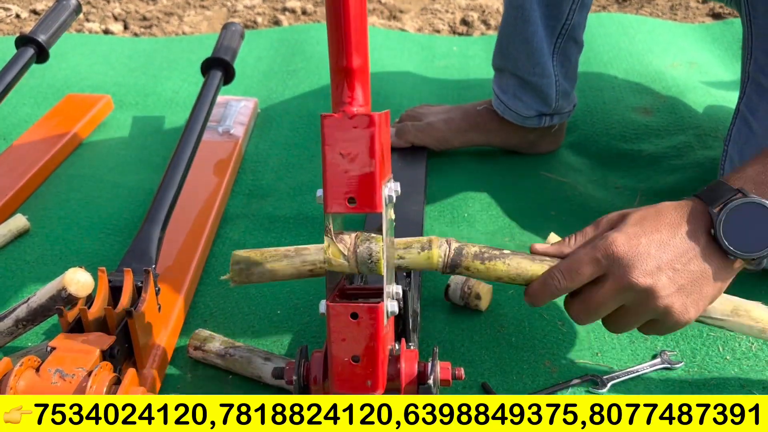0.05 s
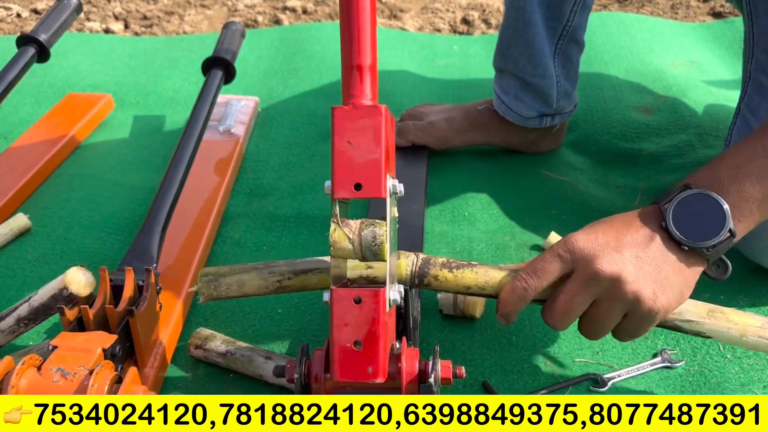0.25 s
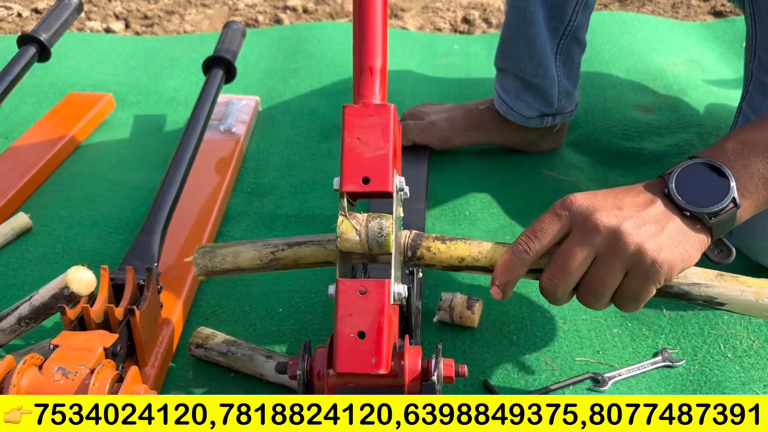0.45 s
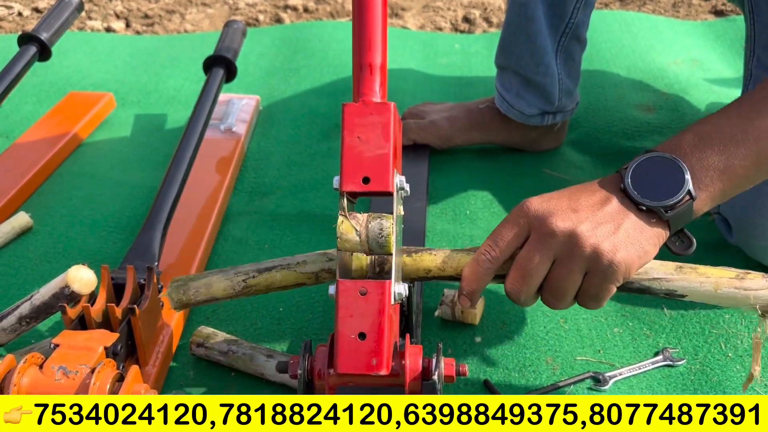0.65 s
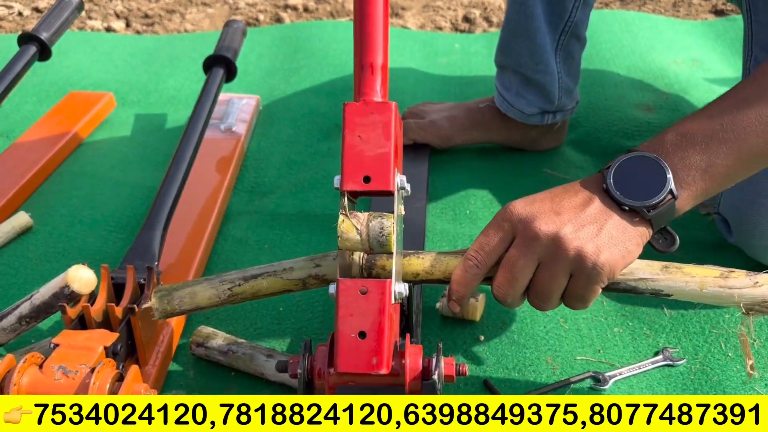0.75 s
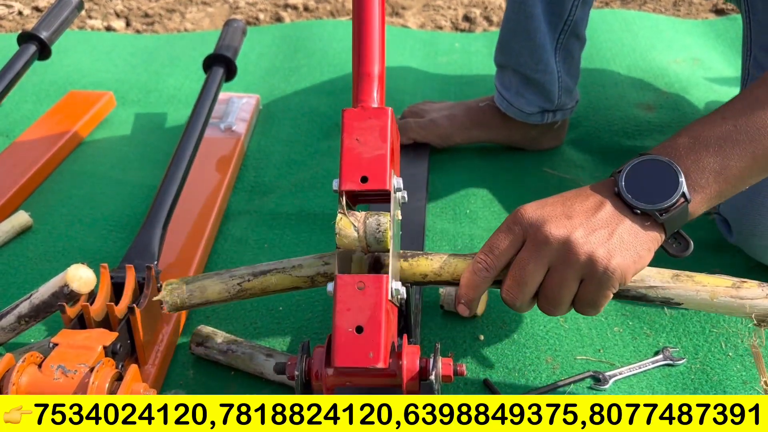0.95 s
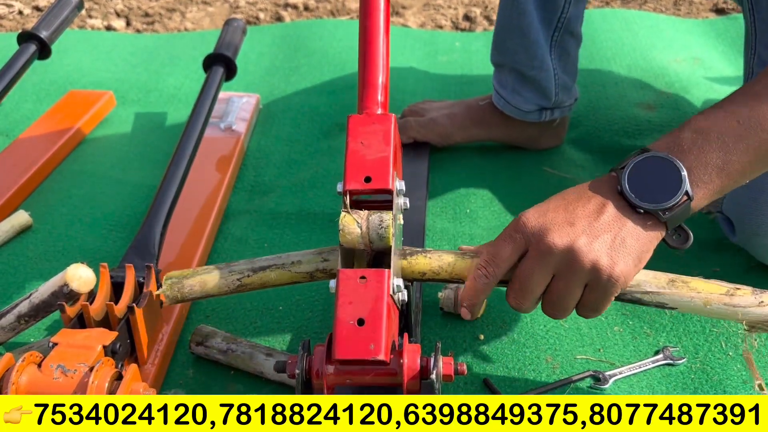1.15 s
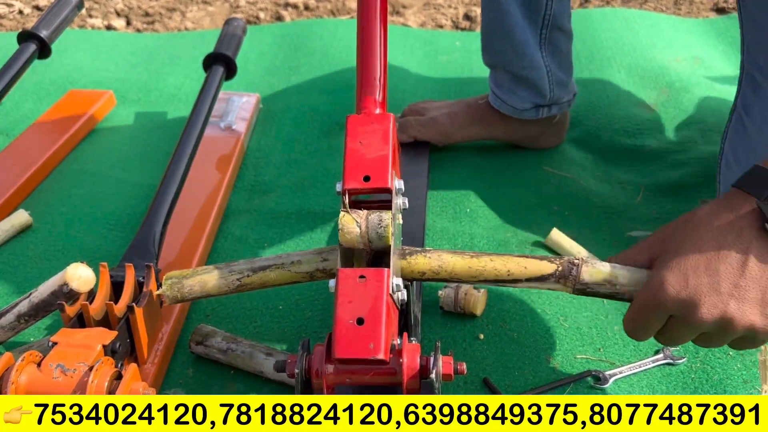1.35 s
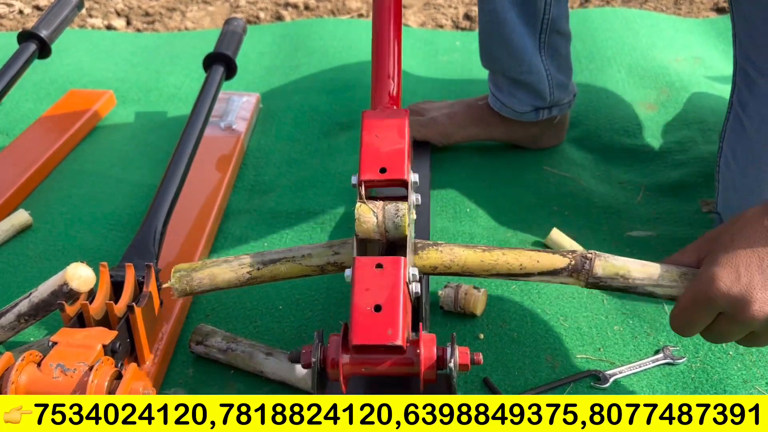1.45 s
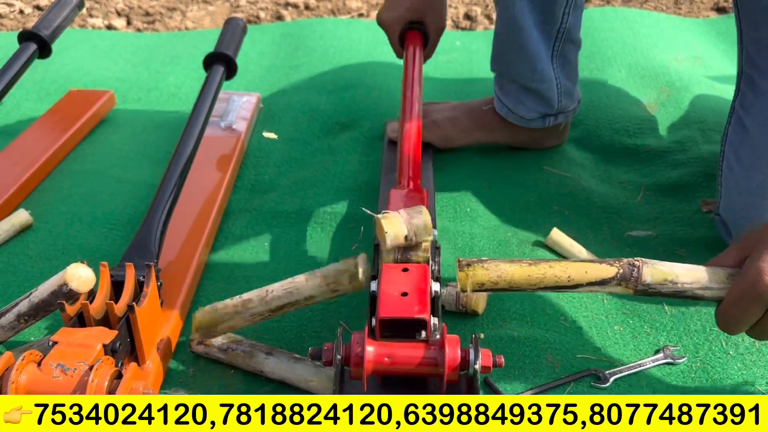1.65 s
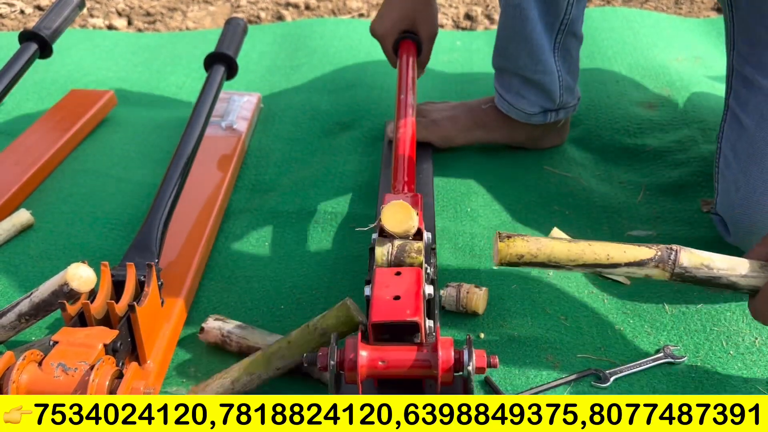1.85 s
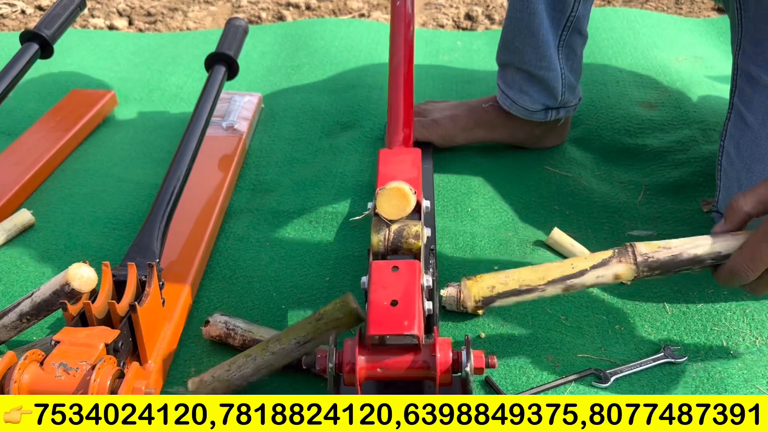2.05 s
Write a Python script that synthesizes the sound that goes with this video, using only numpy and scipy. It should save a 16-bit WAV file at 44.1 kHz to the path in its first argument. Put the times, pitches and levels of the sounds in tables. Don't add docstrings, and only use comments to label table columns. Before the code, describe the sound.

A hand-lever cutter chops through thick cane with a loud crunching snap, then its lever clacks

```python
import sys
import numpy as np
from scipy import signal
from scipy.fft import rfft, irfft, next_fast_len
from scipy.io import wavfile
from scipy.ndimage import uniform_filter1d, map_coordinates

SR = 44100
rng = np.random.default_rng(int(sys.argv[2]) if len(sys.argv) > 2 else 0)


def store_wav(level_fs):
    pcm = np.round(np.clip(np.atleast_2d(level_fs), -1, 1) * 32767)
    wavfile.write(sys.argv[1], SR, pcm.T.astype(np.int16))


def boost(x):
    u = np.asarray(x, float) / 20
    return 10 ** u


N = 92962

# frequency in Hz, density in dB per Hz.
AIR_TONE = [(12, -46.5), (30, -16.5), (70, -4), (194, -2), (547, -14), (595, -12), (4610, -16.5),
            (16300, -38)]
# frequency in Hz, width in Hz, level in dB.
AIR_HUMPS = [(567, 31, -4), (1750, 960, -13), (3395, 460, -13.5)]
# time in seconds, level in dB.
AIR_SWELL = [(0.0, -63.5), (1.77, -63.5), (2.11, -65)]

# start in seconds, then base, cradle, blade and tick levels in dB.
KNOCKS = [(0.175, -57, -49, -60, -58), (.186, -52, -49.5, -72, -49.5), (.193, -63, -49.5, -58, -47),
          (0.231, -51.5, -51.5, -52.5, -56), (.335, -58.5, -71, -66, -74), (.570, -51.5, -50, -70, -47.5),
          (.582, -57, -43, -43, -64), (.698, -44, -42.5, -39, -43.5), (0.716, -84, -71, -39.5, -49.5),
          (.720, -40.5, -24.5, -63, -53), (.785, -51.5, -57, -58.5, -74), (0.92, -72, -52, -62, -54),
          (1.122, -54, -56.5, -47.5, -53.5), (1.159, -61, -64, -65, -56), (1.521, -30, -24.5, -19.5, -23),
          (1.606, -36.5, -14, -28.5, -27), (1.712, -36.5, -33, -34, -52), (1.723, -62.5, -26, -40, -52),
          (1.946, -51, -47, -52, -70)]
# frequency in Hz, level in dB, 60 dB decay time in seconds.
BASE_MODES = [(297, 0, .21), (597, -3, .17)]
# frequency in Hz, level in dB, 60 dB decay time in seconds.
CRADLE_MODES = [(528, 0, .17), (500, -16, .05)]
# frequency in Hz, level in dB, 60 dB decay time in seconds.
BLADE_MODES = [(1285, -7, .07), (1604, -12, .15), (1730, -6, .13), (1790, -1, .04), (2050, 0, .035),
               (2200, -4, .03), (2400, -8, .03), (3400, -16, .04)]
# frequency in Hz, density in dB per Hz.
TICK_TONE = [(200, -10), (2000, -4), (3000, -10), (3750, -8), (4600, -11), (7500, -13), (16000, -36)]
# time in seconds, loss in dB.
MUTES = [(.252, 8), (.743, 8), (1.616, 12)]
# frequency in Hz, level in dB, 60 dB decay time in seconds.
PIN_MODES = [(7440, 0, .12), (8330, -3, .12)]
# start in seconds, level in dB.
PIN_HITS = [(1.677, -60), (1.7, -57), (1.709, -63)]
# frequency in Hz, level in dB, 60 dB decay time in seconds.
WASHER_MODES = [(7700, 0, .06)]
# start in seconds, level in dB.
WASHER_HITS = [(.182, -59), (.195, -57), (.742, -62), (.754, -59.5), (1.622, -56.5)]

# start in seconds, frequency in Hz, level in dB, 60 dB decay time in seconds.
THUDS = [(.571, 202, -46.5, 0.06), (0.722, 127, -47, 0.045), (.571, 3740, -40, .025), (.7, 6950, -49, .02),
         (1.49, 246, -30, 0.037), (1.521, 208.7, -29, 0.028), (1.89, 3770, -35.5, 0.014),
         (0.479, 2390, -50, 0.028), (1.523, 120, -36, 0.08), (1.643, 93, -40, 0.08),
         (1.776, 88, -29.5, 0.052), (1.883, 60, -32, 0.061), (1.947, 1310, -36.5, 0.041),
         (1.958, 813, -46, 0.05)]
# time in seconds, level in dB.
SCUFFS = [(1.86, -67), (1.875, -51.5), (1.891, -42.5), (1.90, -62), (1.955, -54.5), (2.0, -69.5)]
# frequency in Hz, density in dB per Hz.
SCUFF_TONE = [(88, -42), (150, 0.5), (1260, -8.5), (2400, -17.5), (3840, -18.5), (16000, -41)]

# time in seconds, level in dB.
STRAIN = [
    (1.33, -72.5),
    (1.44, -62.5),
    (1.474, -57),
    (1.488, -39.5),
]
# start in seconds, level in dB, 60 dB decay time in seconds,
# pitch of the splitting strip in Hz, level of crack over strip in dB.
SNAPS = [(1.476, -42.5, 0.0084, 1920, 4.5), (1.4815, -32, 0.0098, 5070, 2.5),
         (1.4883, -14.5, 0.0092, 1780, 4.5), (1.489, -11, 0.011, 2080, -1),
         (1.4917, -8.5, 0.0087, 1750, -16), (1.4887, -11.5, 0.017, 2630, -9),
         (1.4889, -19.5, 0.019, 3540, -2.5), (1.489, -21, 0.022, 4930, -4.5),
         (1.5195, -25, .012, 4570, -10.5), (1.4955, -20.5, 0.024, 2107, -7.5),
         (1.5028, -25, 0.022, 4840, 1.5), (1.509, -29, 0.0087, 1730, -2), (1.514, -26, .015, 2050, -6.5),
         (1.5175, -16.5, 0.012, 2557, -3.5), (1.5197, -14, .011, 1716, 4), (1.5208, -17, 0.0089, 1276, 3.5),
         (1.5245, -20.5, 0.022, 1243, -4), (1.531, -25, 0.017, 2050, 4.5), (1.537, -17, .012, 1507, -6),
         (1.5457, -12.5, 0.019, 1623, -9), (1.549, -15.5, 0.019, 2073, -4.5),
         (1.555, -23, 0.059, 3340, -5.5), (1.5565, -18, .015, 1430, -5.5), (1.5635, -15, 0.01, 2080, -4),
         (1.571, -10, 0.012, 1730, -9.5), (1.578, -19, 0.014, 2200, -5.5), (1.586, -21, 0.014, 1383, -7),
         (1.6005, -11, 0.024, 1362, -5)]
# time in seconds, level in dB.
TEARING = [(1.49, -23.5), (1.5, -30), (1.512, -30), (1.522, -27), (1.54, -22.5), (1.57, -27),
           (1.595, -21.5), (1.612, -26.5), (1.64, -64)]
# frequency in Hz, density in dB per Hz.
FIBRE_TONE = [(59, -66.5), (100, -24), (289, -10.5), (600, -8.5), (1030, -17), (1720, -0.5), (2470, -8.5),
              (4670, -8.5), (10000, -21), (16000, -41.5)]
# frequency in Hz, width in Hz, level in dB.
CANE_RESONANCES = [(458, 100, -16), (843, 180, -4), (1310, 150, 4.5), (1700, 42.3, -6.5), (1610, 52, -2.5),
                   (2110, 58, 3), (2700, 210, -2.5), (3340, 18, -9.5), (4570, 32, -23.5),
                   (5600, 34.5, -21.5), (6120, 81, -8), (7060, 490, -11.5)]

# frequency in Hz, level in dB, 60 dB decay time in seconds.
JAW_MODES = [(605, -10, .14), (820, -12, 0.05), (1330, -10, .05), (1650, -14, 0.12), (2398, 3, .03),
             (3156, -2, 0.028), (3280, -21, .12)]
# frequency in Hz, level in dB, 60 dB decay time in seconds.
LEVER_MODES = [(382, -12, .3), (431, -5.5, .42), (408, 1, .045), (760, -19, .25), (818, -21, .22),
               (867, -24, .2)]
# time in seconds, level in dB.
RATTLE = [(1.62, -33.5), (1.65, -38.5), (1.70, -41.5), (1.735, -48), (1.76, -65), (1.80, -79)]
# frequency in Hz, density in dB per Hz.
RATTLE_TONE = [(350, -37.5), (600, -5.5), (1510, -14), (1680, -10.5), (3200, -17.5), (14000, -51.5)]
# frequency in Hz, width in Hz, level in dB.
RATTLE_RESONANCES = [(778, 64, 0), (1320, 70, 1), (1680, 100, 3), (2160, 80, -10), (2750, 90, -12),
                     (3300, 160, -4), (4160, 120, -16), (4600, 110, -13), (5850, 140, -20)]
# frequency in Hz, level in dB, 60 dB decay time in seconds.
STOP_MODES = [(296, -10, .28), (592, -6, .19), (883, -15, .14), (1170, 5, .05), (1227, 0, .12),
              (1610, -3, .15), (2649, -3, .04), (2870, 11, .022), (4570, -1, .045), (5518, -22, .15),
              (6767, -23, .11), (7434, -38, .7), (8323, -33, .18), (9351, -33, .15)]
# frequency in Hz, density in dB per Hz.
STOP_TONE = [(250, -11), (700, -5.5), (1200, 5), (3000, -6), (5000, -10), (9000, -19.5), (16000, -65)]


def along(points, hz):
    f, v = np.transpose(points)
    return np.interp(np.log(hz + 1), np.log(f + 1), v)


def unit(x):
    return x / np.sqrt(np.mean(x ** 2) + 1e-20)


def level(rows):
    s, db = np.transpose(rows)
    return boost(np.interp(np.arange(N) / SR, s, db, left=-150, right=-150))


def toned(tone):
    return lambda f: boost(along(tone, f))


def peaked(tone, peaks, share_db):
    def gain(f):
        peak_power = 0
        for centre, width, db in peaks:
            peak_power = peak_power + boost(2 * (db + share_db)) / (1 + (2 * (f - centre) / width) ** 2) ** 2
        return np.sqrt(boost(2 * along(tone, f)) + peak_power)
    return gain


def coloured(x, gain):
    m = 2 * next_fast_len(N // 2 + 4096)
    g = gain(np.fft.rfftfreq(m, 1 / SR))
    cepstrum = irfft(np.log(g / np.sqrt(np.mean(g ** 2)) + 1e-6), m)
    cepstrum[1:m // 2] *= 2
    cepstrum[m // 2 + 1:] = 0
    return irfft(rfft(x, m) * np.exp(rfft(cepstrum)), m)[:N]


def patchy(x, depth_db, size, bins, frames):
    z = signal.stft(x, nperseg=size)[2]
    field = uniform_filter1d(rng.standard_normal(z.shape), bins, 0)
    field = uniform_filter1d(field, frames, 1)
    return signal.istft(z * boost(depth_db * unit(field)), nperseg=size)[1][:N]


def add(track, s, sound):
    part = track[round(s * SR):][:len(sound)]
    part += sound[:len(part)]


def flutter(t, depth_db):
    per_s = 50
    shake = map_coordinates(rng.standard_normal(per_s), [t * per_s])
    return depth_db * np.minimum(t / .03, 1) * shake


def ring(modes, db, rise_s=.0005, scatter_db=.5, flutter_db=2):
    t = np.arange(SR // 2) / SR
    hit = np.zeros(len(t))
    for hz, mode_db, t60 in modes:
        strike_db = db + mode_db + scatter_db * rng.normal()
        hit += boost(strike_db + flutter(t, flutter_db) - 60 * t / t60) * np.sin(2 * np.pi * hz * t)
    return hit * (1 - np.exp(-t / rise_s))


def burst(db, t60, rise_s=.0001):
    t = np.arange(SR // 10) / SR
    return boost(db - 60 * t / t60) * (1 - np.exp(-t / rise_s)) * rng.standard_normal(len(t))


def grit(per_s, spread_db):
    breaks = (rng.random(N) < per_s / SR) * rng.standard_normal(N)
    sizes = boost(spread_db * rng.exponential(size=N))
    return unit(breaks * sizes + 0.25 * rng.standard_normal(N))


def air():
    noise = patchy(rng.standard_normal(N), 1.3, 512, 6, 10)
    return boost(2.5) * level(AIR_SWELL) * unit(coloured(noise, peaked(AIR_TONE, AIR_HUMPS, 0)))


def cradle_muting(s):
    t = np.arange(SR // 2) / SR
    loss_db = np.zeros(len(t))
    for at, db in MUTES:
        if 0 < at - s < .05:
            loss_db += db * np.clip((s + t - at) / .003, 0, 1)
    return boost(-loss_db)


def frame():
    out, ticks = np.zeros(N), np.zeros(N)
    for s, base_db, cradle_db, blade_db, tick_db in KNOCKS:
        add(out, s, ring(BASE_MODES, base_db, 0.0028))
        add(out, s, cradle_muting(s) * ring(CRADLE_MODES, cradle_db, 0.0022))
        add(out, s, ring(BLADE_MODES, blade_db, 0.00098, scatter_db=3.5))
        add(ticks, s, burst(tick_db, .03, 0.00093))
    for s, db in PIN_HITS:
        add(out, s, ring(PIN_MODES, db, 0.004))
    for s, db in WASHER_HITS:
        add(out, s, ring(WASHER_MODES, db, 0.0021))
    return out + coloured(ticks, toned(TICK_TONE))


def pieces():
    out = np.zeros(N)
    scuff = level(SCUFFS) * grit(5000, 3.3)
    for s, hz, db, t60 in THUDS:
        add(out, s, ring([(hz, 0, t60)], db, 0.0021))
    add(scuff, 1.8915, burst(-37, 0.0044))
    return out + coloured(scuff, toned(SCUFF_TONE))


def cut():
    breaks_per_s, spread_db = 9900, 0
    strip_db, strip_rings_longer = -1, 1.67
    tearing = unit(patchy(grit(breaks_per_s, spread_db), 3.5, 128, 3, 5))
    drive = boost(-1.1) * level(TEARING) * tearing
    creak = coloured(grit(breaks_per_s, spread_db), lambda f: f / (2000 + f) / (1 + (f / 6000) ** 4))
    strips = level(STRAIN) * creak
    for s, db, t60, hz, crack_db in SNAPS:
        add(drive, s, burst(db + crack_db, t60))
        add(strips, s, ring([(hz, strip_db, strip_rings_longer * t60)], db))
    drive[round(1.4891 * SR)] += boost(4.5)
    return strips + coloured(drive, peaked(FIBRE_TONE, CANE_RESONANCES, -2))


def lever():
    lever_s, stop_s = 1.6352, 1.7422
    out, crack = np.zeros(N), np.zeros(N)
    add(out, 1.6065, ring(JAW_MODES, -13, 0.00057))
    since_stop = lever_s - stop_s + np.arange(SR // 2) / SR
    held = boost(-6 * np.clip(since_stop / .02, 0, 1))
    add(out, lever_s, held * ring(LEVER_MODES, -16, .003, flutter_db=.6))
    add(out, stop_s, ring(STOP_MODES, -24.5))
    add(crack, stop_s, burst(-21, .045))
    rattle = level(RATTLE) * grit(2700, 2.4)
    rattle = coloured(rattle, peaked(RATTLE_TONE, RATTLE_RESONANCES, -3))
    return out + rattle + coloured(crack, toned(STOP_TONE))


def yard(tool):
    puff = np.pad(burst(0, .12), (300, N))[:N]
    tail = coloured(puff, lambda f: 1 / (1 + (f / 3000) ** 2))[:SR // 8]
    return boost(-21) * signal.fftconvolve(tool, tail / np.linalg.norm(tail))[:N]


def scene():
    tool = frame() + cut() + lever() + pieces()
    return (tool + yard(tool) + air())[None]


def band_limit(x):
    return signal.sosfilt(signal.butter(12, 16430, fs=SR, output="sos"), x)


def record(dry):
    ceiling, knee = .92, 5
    low_hz, top_hz = 60, 15900
    rounded = dry / (1 + np.abs(dry / ceiling) ** knee) ** (1 / knee)
    f = np.fft.rfftfreq(N, 1 / SR)
    mic = 1j * f / (low_hz + 1j * f) / (1 + (f / top_hz) ** 200)
    mix = irfft(rfft(rounded) * mic, N)
    return band_limit(mix)


dry = scene()
out = record(dry)
store_wav(out)
```